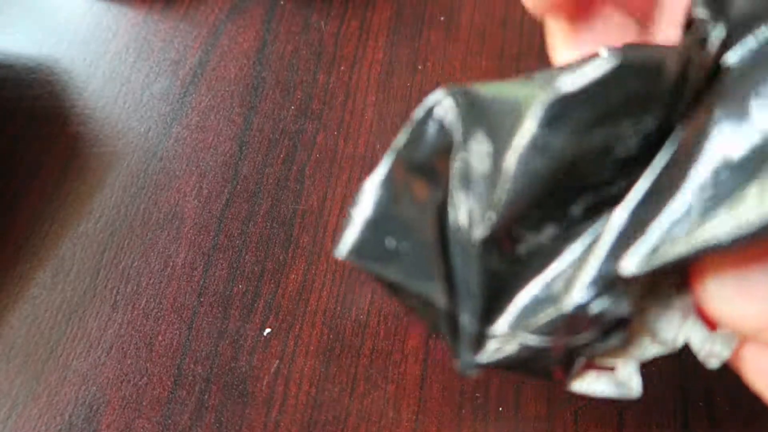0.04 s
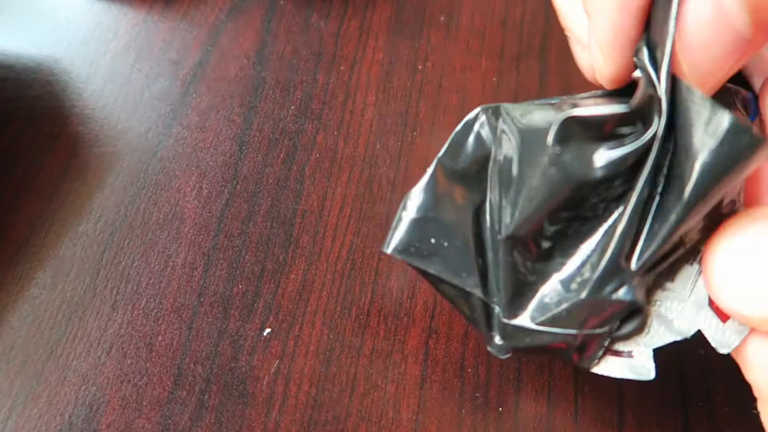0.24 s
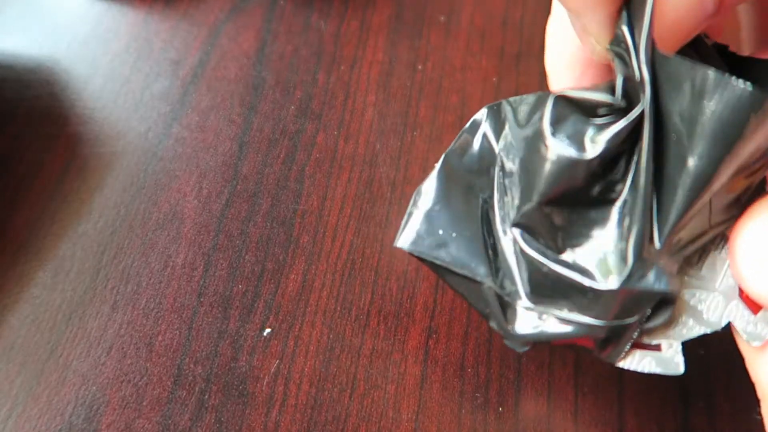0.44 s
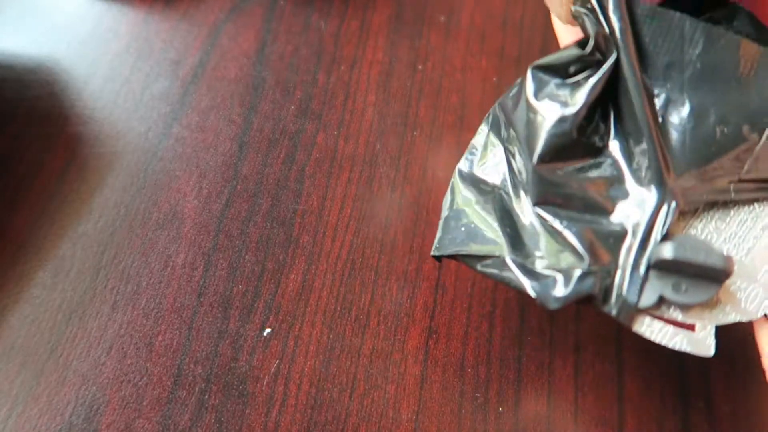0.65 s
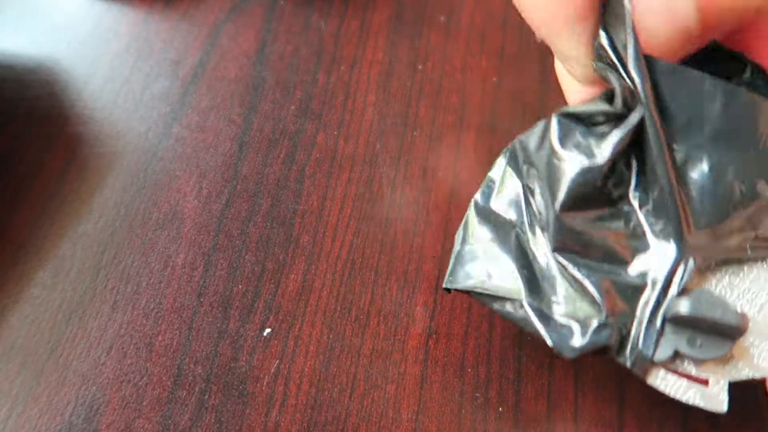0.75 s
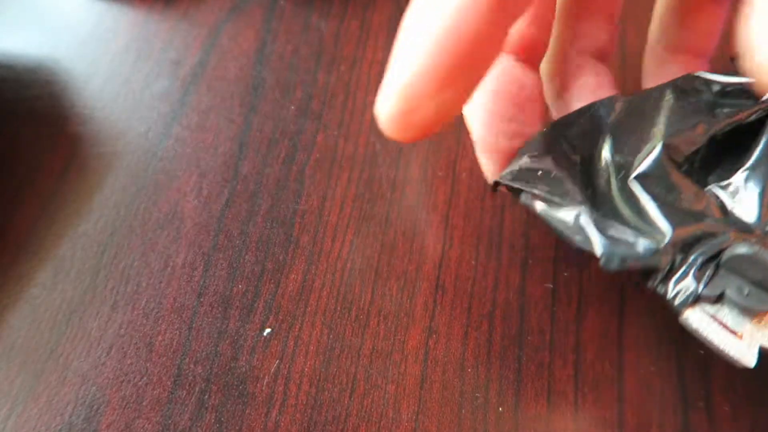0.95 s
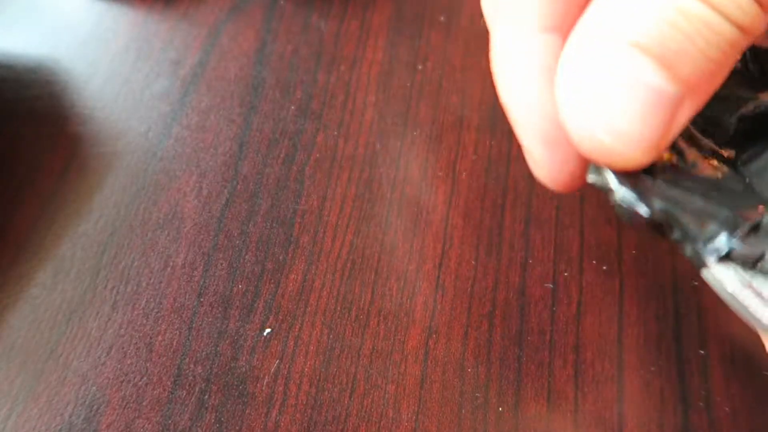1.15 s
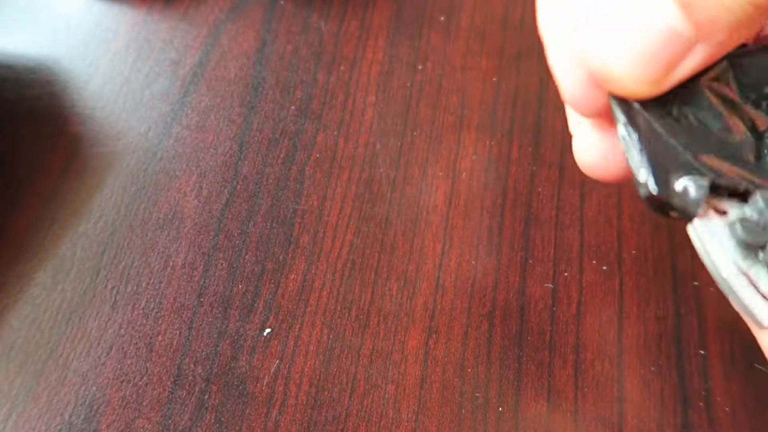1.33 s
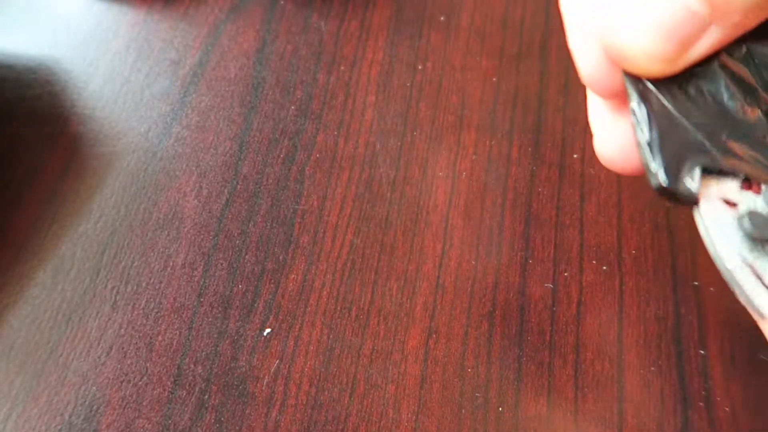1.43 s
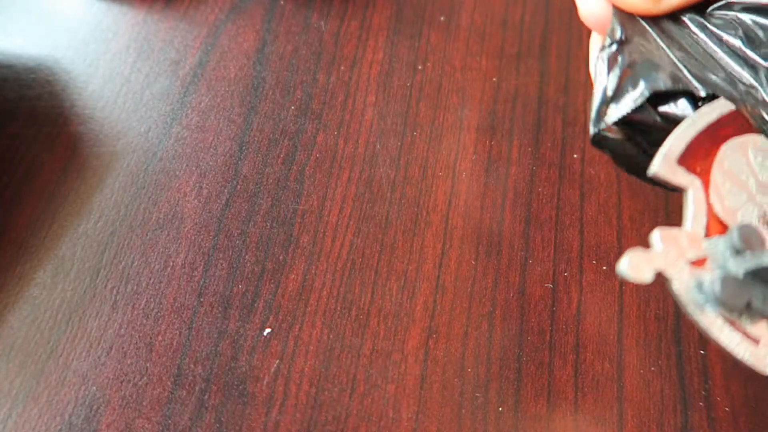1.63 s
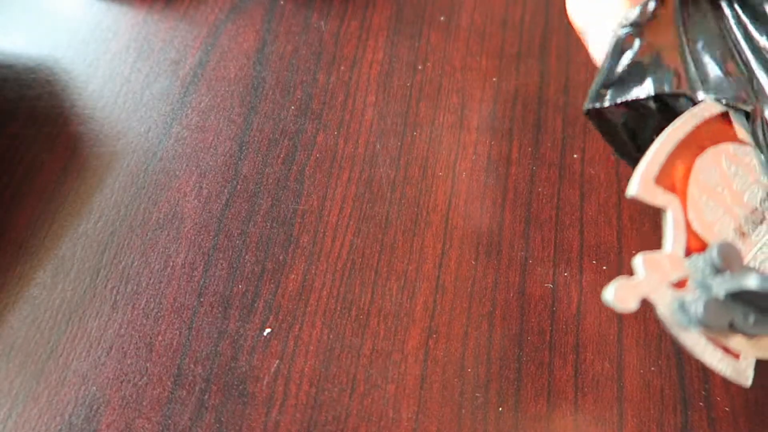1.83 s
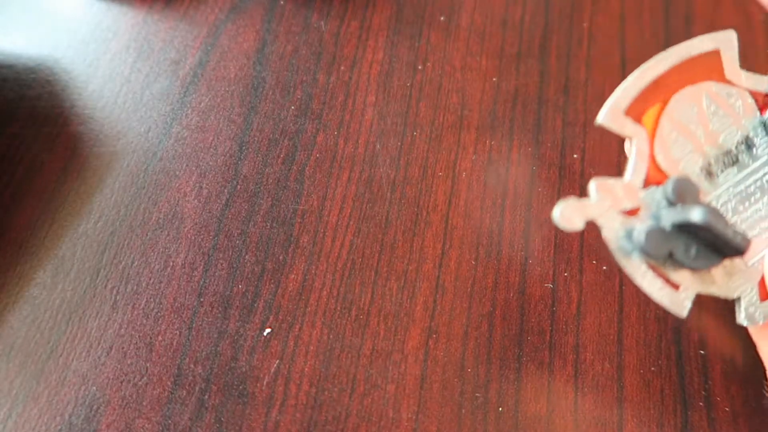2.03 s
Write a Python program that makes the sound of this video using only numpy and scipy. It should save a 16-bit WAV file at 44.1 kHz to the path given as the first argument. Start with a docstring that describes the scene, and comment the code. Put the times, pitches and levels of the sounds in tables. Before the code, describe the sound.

Crinkling plastic-foil wrapper, close up, snapping and rustling unevenly in a small quiet room

```python
"""Crisp snaps and a short rustle open the scene: hands squeeze and open a stiff foil bag over a table.
Creases buckle one by one: each snap is a brief ring of a foil facet, a sharp crack and a low flap.
Each squeeze adds tiny crackles, sliding hiss and facet ticks; large panels pop with a thump and a flutter.
The bag is close to the microphone; a small room answers over low noise and a faint hum."""
import sys
import numpy as np
from scipy import signal
from scipy.fft import rfft, irfft, next_fast_len
from scipy.io import wavfile

SR = 44100
rng = np.random.default_rng(int(sys.argv[2]) if len(sys.argv) > 2 else 0)


def master(y):
    """Save y as 16-bit WAV."""
    cut = np.clip(np.atleast_2d(y).T, -1, 1)
    pcm = np.round(cut * 32767)  # scale
    wavfile.write(sys.argv[1], SR, pcm.astype(np.int16))


N = 91683  # length in samples

# Creases that buckle: start_s, facet_pitch_hz, ring_time_cycles, ring_level_db, crack_level_db
SNAPS = [(0.0114, 2880, 0.27, -24, -26.5), (0.0181, 4570, 1, -25, -36), (0.0225, 2760, 0.17, -15, -42),
         (0.0287, 3900, .48, -22.5, -27.5), (0.037, 2930, 0.54, -23.5, -38), (0.07, 1540, .71, -30.5, -38),
         (0.105, 3670, .31, -23.5, -45), (0.115, 1490, 1, -21.5, -22.5), (0.1465, 1590, 0.73, -31, -38),
         (0.153, 1270, 0.99, -31, -42), (0.174, 3100, 0.43, -16, -34), (0.199, 2850, 0.3, -23.5, -34),
         (0.2175, 2350, 0.56, -17.5, -19.5), (0.262, 3030, 0.43, -22, -31), (0.2749, 3600, 1.4, -20, -28),
         (0.2805, 7000, 0.85, -22, -30), (0.2849, 4860, 0.36, -18, -18), (0.2906, 1280, 0.67, -17, -15.5),
         (0.3096, 7700, 0.26, -18, -14), (0.3334, 2580, 0.39, -30, -46), (0.3585, 1000, 0.51, -27, -26),
         (0.435, 3040, 0.43, -17, -27), (0.439, 2680, 0.3, -22.5, -44), (0.4426, 2334, .6, -27.5, -38),
         (0.4515, 3320, 0.7, -23, -26), (0.4605, 3100, .7, -26, -40), (0.502, 3190, 0.75, -17.5, -23),
         (0.5225, 3200, 0.62, -24.5, -40), (0.5257, 3010, 0.31, -24.5, -36), (0.545, 1500, 0.59, -18, -24),
         (0.5642, 3380, 0.17, -22, -45), (0.5763, 800, 0.26, -17.5, -17), (0.5782, 2580, 0.32, -18.5, -35),
         (0.5803, 1176, 1.76, -11, -29), (0.5834, 2420, 0.33, -10.5, -24), (0.5896, 2380, 0.32, -21, -28),
         (0.596, 3180, 0.45, -16, -20), (0.6031, 2900, 0.43, -16.5, -26), (0.6084, 9500, 0.52, -18.5, -29),
         (0.6093, 3670, 0.36, -13, -31), (0.6186, 2440, 0.37, -21, -22), (0.624, 5170, 0.16, -17, -16.5),
         (0.6268, 2450, .57, -15, -21), (0.6285, 3400, 1.3, -17.5, -20.5), (0.698, 3400, 0.44, -27.5, -29),
         (0.7404, 1520, 0.69, -23.5, -24), (0.834, 1320, 0.39, -27, -31), (0.8514, 3170, 0.28, -19, -25.5),
         (0.8776, 910, 0.31, -15.5, -13), (0.8804, 1290, 0.15, -16.5, -42), (0.8959, 3370, 1.4, -20.5, -20),
         (0.9206, 2980, 0.58, -18, -43), (0.9297, 3010, 0.38, -23, -28), (0.934, 2410, 0.33, -27, -31),
         (0.9418, 3570, 0.63, -8.5, -23), (1.0247, 3190, 1, -14, -22), (1.0568, 2920, 0.68, -21, -43),
         (1.0585, 1450, 0.64, -18.5, -56), (1.1212, 1740, 0.13, -25, -35), (1.1452, 3400, 1.5, -24, -46),
         (1.1481, 3060, 0.53, -21.5, -40), (1.1831, 3260, 0.26, -21.5, -21), (1.1856, 1060, 0.85, -24, -21),
         (1.2013, 1530, .35, -22.5, -33), (1.2354, 1950, 0.42, -21, -20.5), (1.2518, 1840, .33, -21.5, -30),
         (1.2785, 2130, 0.37, -17, -17), (1.2813, 1420, 0.56, -21, -47), (1.2868, 3670, 0.94, -21.5, -31),
         (1.2952, 1110, .6, -33, -38), (1.3123, 1300, 0.76, -20, -39), (1.3173, 2800, 0.31, -19.5, -48),
         (1.4312, 1414, .9, -11, -19.5), (1.4515, 1740, 1.1, -27, -28.5), (1.4815, 1890, 0.56, -34.5, -50),
         (1.493, 1320, 0.65, -26.5, -23), (1.4983, 4430, 0.51, -21, -36), (1.594, 2950, .24, -30.5, -45),
         (1.6065, 1810, .7, -35, -60), (1.6305, 2240, 0.37, -34, -56), (1.6525, 4370, 0.72, -29.5, -37),
         (1.658, 4390, 0.21, -28.5, -41), (1.6652, 1385, 0.39, -9, -15), (1.669, 4400, 0.54, -20, -27),
         (1.683, 2500, 1.6, -20.5, -19), (1.691, 1920, 0.6, -23.5, -28), (1.6969, 1530, 1.2, -27.5, -24),
         (1.7128, 2640, 1.3, -28, -24), (1.7207, 4300, .6, -25.5, -37), (1.807, 1320, 0.45, -32, -33.5),
         (1.8385, 2400, 1.3, -39, -31.5), (1.871, 3170, .5, -32, -32), (1.8782, 4960, 0.22, -24.5, -27),
         (1.9173, 4200, .84, -19, -23.5), (1.9258, 3600, 1.4, -28, -20.5), (1.9598, 2940, 0.37, -26, -40),
         (1.9683, 3290, .5, -25.5, -25.5), (1.9725, 2080, .14, -23, -45), (1.9923, 1180, 0.36, -19.5, -17),
         (2.001, 2560, 1.3, -21, -30), (2.0071, 2570, 1.3, -17, -38), (2.0492, 4300, 0.56, -21.5, -29),
         (2.053, 1920, 0.35, -22, -24), (2.0663, 2330, 0.18, -22, -28)]
# Squeezes that rustle: start_s, length_s, body_level_db, treble_level_db (both before the trims below)
SQUEEZES = [(0.003, 0.042, -39, -41.5), (0.114, 0.046, -41, -47.5), (0.273, 0.053, -41.5, -31),
            (0.343, 0.024, -39, -57), (0.43, 0.019, -33.5, -38.5), (0.525, 0.041, -38, -52),
            (0.576, 0.054, -31.5, -30.5), (0.866, 0.056, -36, -35), (1.122, 0.027, -41.5, -56),
            (1.17, 0.164, -43.5, -51.5), (1.346, 0.036, -46.5, -58), (1.415, 0.025, -35, -34),
            (1.665, 0.022, -35, -31), (1.699, 0.035, -56, -40), (1.899, 0.18, -40, -47)]
# Large panels popping through: start_s, pitch_hz, level_db
THUMPS = [(.022, 269, -32), (0.5014, 306, -25), (0.5761, 264, -20), (0.583, 191, -26.5),
          (0.622, 197, -27.5), (0.626, 493, -20.5), (0.878, 186, -30), (0.8795, 445, -29.5),
          (1.0571, 430, -23.5), (1.147, 665, -23), (1.431, 440, -30), (1.6659, 518, -15.5),
          (1.991, 500, -29.5)]
# Tone of a crack: frequency_hz, relative_level_db
CRACK_TONE = [(100, -34.5), (900, -6), (2500, 6.5), (7000, 0.5), (9000, -6), (12000, -8.5), (15000, -24.5)]
# Tone of the rustle's body: frequency_hz, relative_level_db
RUSTLE_TONE = [(60, -20), (200, 1), (500, 3.5), (1300, 4.5), (3200, 3), (4800, -4), (7000, -50)]
# Tone of the rustle's treble: frequency_hz, relative_level_db
FIZZ_TONE = [(2500, -6), (5200, 2), (7500, 0.5), (9000, -4), (12000, -4), (15000, -23)]
# Tone of a panel's flutter: frequency_hz, relative_level_db
FLUTTER_TONE = [(90, -28), (220, 1), (480, 4), (800, -35)]
# Time for the room tail to fall 60 dB: frequency_hz, decay_s
ROOM_T60 = [(150, 0.3), (3000, 0.15), (12000, 0.15)]
# Likeness of left and right in rustle and room noise: frequency_hz, correlation (1 = identical)
LIKENESS = [(100, 0.98), (220, 0.043), (600, 0.18), (2000, 1), (10000, 0.24)]
# Tone of the room noise: frequency_hz, relative_level_db
FLOOR_TONE = [(25, -5), (45, -7), (130, -3), (220, -9.5), (420, -12), (14000, -46)]
# Steady hum tones: frequency_hz, level_db
HUM = [(120, -59), (208, -59)]

# Background and room
FLOOR_DB = -49.5
ROOM_DB = -14.5

# Rustle: trims inside a squeeze, then levels while the bag is only held
RUSTLE_TRIM_DB, FIZZ_TRIM_DB = -5, -1
REST_DB, REST_FIZZ_DB = -61, -61.5
ATTACK_S, RELEASE_S = 0.0025, 0.007  # exponential rise and fall around a squeeze
GRAINS_PER_S_PER_BAND, GRAIN_SPREAD_DB = 450, 3
SLIDE_SHARE = 0.15  # gain of the sliding hiss against crackles of rms 1
TICKS_PER_S, TICK_HZ, TICK_REACH_OCTAVES = 260, 2620, 1.28  # pitches reach this far either way
TICK_CYCLES, TICK_DB, TICK_SPREAD_DB = 0.53, 3.5, 6  # ticks are up to the spread louder than TICK_DB

# Thumps: the panel's two modes, the puff of air it pushes, and the flutter after the pop
THUMP_CYCLES, PANEL_RATIO, PANEL_GAIN = 0.98, 1.428, 0.63
PUSH_HZ, PUSH_DB = 80, -20
FLUTTER_DB, FLUTTER_S = -11, 0.0065

# Snaps
CRACK_S, CRACK_SPIKE = 0.0008, 4  # decay of the crack's noise; height of its first sample
BOUNCE_GAIN, BOUNCE_S = 0.3, 0.00061  # a close echo of the crack off the table, delayed by up to this time
OVERTONE_DB, OVERTONE_CYCLES = -13.5, 1.86  # second mode of a facet
FLAP_HZ, FLAP_CYCLES, FLAP_DB = 517, 0.9, -22.5
NEAR_DB, NEAR_S = -11, 0.0045  # early echoes off table and hands, and their decay
SLIP_DB, SLIP_S = -16.5, 0.003  # a crease gives a little before it snaps, up to this much earlier
DISPERSE_S, DISPERSE_HZ = 0.000732, 2880  # the bass lags by this time; the lag halves at this pitch

# Placement and recorder
LAG_S, LEFT_DB = 0.000016, -0.54  # left against right
TOP_HZ, LOW_CUT_HZ = 16000, 34.5


def amp(db):
    """Turn decibels into gain."""
    return 10 ** (np.asarray(db) / 20)


def unit(x):
    """Scale to rms 1."""
    return x / np.sqrt(np.mean(x ** 2) + 1e-20)


def burst(x):
    """Scale to the energy of one millisecond at rms 1."""
    return x * np.sqrt(SR / 1000 / np.sum(x ** 2))


def along(points, hz):
    """Read a curve of (frequency_hz, value) points on a log frequency axis."""
    f, v = np.transpose(points)
    return np.interp(np.log(hz + 1), np.log(f + 1), v)


def filtered(x, response):
    """Filter x by a response given as a function of frequency."""
    m = next_fast_len(N + SR // 2)
    return irfft(rfft(x, m) * response(np.fft.rfftfreq(m, 1 / SR)), m)[..., :N]


def causal(points, size=2048):
    """Minimum-phase response of a tone curve, so a coloured sound keeps its sharp start."""
    cepstrum = irfft(np.log(amp(along(points, np.fft.rfftfreq(size, 1 / SR)))))
    cepstrum[1:size // 2] *= 2
    cepstrum[size // 2 + 1:] = 0
    return np.exp(rfft(cepstrum))


def spread(pair, tone):
    """Colour two unrelated signals and blend them as mid and side into a stereo sound of rms 1."""
    def mid_side_gains(hz):
        turn = np.arccos(np.clip(along(LIKENESS, hz), -1, 0.995)) / 2
        return amp(along(tone, hz)) * [np.cos(turn), np.sin(turn)]

    mid, side = filtered(pair, mid_side_gains)
    return unit(np.array([mid + side, mid - side]))


def add(track, s, sound):
    """Mix a sound into the track at time s, or at the start if s is negative."""
    part = track[..., max(0, round(s * SR)):]
    n = min(part.shape[-1], sound.shape[-1])
    part[..., :n] += sound[..., :n]


def ring(hz, cycles, size=2048):
    """A heavily damped swing of the foil: a sine that swells and dies within a few cycles."""
    turns = np.arange(size) / SR * hz
    u = turns / max(cycles, 0.1)
    return burst(u * np.exp(-u) * np.sin(2 * np.pi * turns))


def background():
    """Low room noise, shaped from random noise, under steady sines for the faint hum."""
    t = np.arange(N) / SR
    hum = np.zeros(N)
    for hz, db in HUM:
        hum += amp(db) * unit(np.sin(2 * np.pi * (hz * t + rng.random())))
    return amp(FLOOR_DB) * spread(rng.standard_normal((2, N)), FLOOR_TONE) + hum


def room(x, count=8, width=0.26):
    """A short diffuse tail of decaying noise, drawn anew for each stretch as the bag moves."""
    out = np.zeros((2, N))
    mono = x.mean(0)
    for part in np.array_split(np.arange(N), count):
        hz, t, bins = signal.stft(rng.standard_normal((2, SR // 3)), SR, nperseg=256)
        decay = amp(-60 * t / along(ROOM_T60, hz)[:, None])
        mid, side = signal.istft(bins * decay, SR, nperseg=256)[1]
        tail = np.array([mid + width * side, mid - width * side])
        tail /= np.linalg.norm(tail[0])
        reply = signal.fftconvolve(mono[None, part], tail, axes=1)
        add(out, part[0] / SR + 0.003, reply)  # 3 ms before the tail starts
    return out


def crackles(count=7):
    """Tiny grains over the hiss of sliding foil; each grain sounds in about one octave only."""
    hits = rng.random((count, N)) < GRAINS_PER_S_PER_BAND / SR
    sizes = hits * amp(GRAIN_SPREAD_DB * np.clip(rng.standard_normal((count, N)), -2, 2))
    signs = rng.choice([-1, 1], (2, count, N))  # drawn separately for each channel

    def octave_bands(hz):
        octaves_down = np.clip(np.log2(TOP_HZ / (hz + 1)), 0, count - 1)
        distance = octaves_down - np.arange(count)[:, None]
        return np.cos(np.pi / 2 * np.clip(distance, -1, 1))

    grains = filtered(sizes * signs, octave_bands)
    return unit(grains.sum(1)) + SLIDE_SHARE * rng.standard_normal((2, N))


def ticks(strength):
    """Small facets flip at random, each at its own pitch, as hard as the bag is being squeezed."""
    out = np.zeros(N)
    for when, pitch, size in rng.random((int(TICKS_PER_S * N / SR), 3)):
        hz = TICK_HZ * 2 ** (TICK_REACH_OCTAVES * (2 * pitch - 1))
        level = strength[int(when * N)] * amp(TICK_DB + TICK_SPREAD_DB * size)
        add(out, when * N / SR, level * ring(hz, TICK_CYCLES))
    return out


def rustle():
    """Tiny crackles, sliding foil and ticks swell with each squeeze; body and treble have own levels."""
    t = np.arange(N) / SR
    body, fizz = np.full(N, amp(REST_DB)), np.full(N, amp(REST_FIZZ_DB))
    for s, length, body_db, fizz_db in SQUEEZES:
        rise, fall = (t - s) / ATTACK_S, (s + length - t) / RELEASE_S
        shape = np.exp(np.minimum(0, np.minimum(rise, fall)))
        body = np.maximum(body, amp(body_db + RUSTLE_TRIM_DB) * shape)
        fizz = np.maximum(fizz, amp(fizz_db + FIZZ_TRIM_DB) * shape)
    grains = crackles()
    return body * spread(grains, RUSTLE_TONE) + fizz * spread(grains, FIZZ_TONE) + ticks(body)


def thumps(size=2048):
    """A large panel pops through in two modes, pushes a little air and flutters on."""
    out, t = np.zeros((2, N)), np.arange(size) / SR
    for s, hz, db in THUMPS:
        noise = rng.standard_normal(size) * np.exp(-t / FLUTTER_S)
        flutter = burst(irfft(rfft(noise) * causal(FLUTTER_TONE)))
        second_mode = ring(hz * PANEL_RATIO, THUMP_CYCLES * PANEL_RATIO)
        panel = burst(ring(hz, THUMP_CYCLES) + PANEL_GAIN * second_mode)
        pop = panel + amp(PUSH_DB) * ring(PUSH_HZ, cycles=0.1)
        # the flutter has opposite sign at each side
        add(out, s, amp(db) * (pop + amp(FLUTTER_DB) * np.array([flutter, -flutter])))
    return out


def snaps(size=2048, width=0.22):
    """Each crease rings, cracks and flaps; the wave spreads in the sheet and scatters off hands and table."""
    out, t, colour = np.zeros((2, N)), np.arange(size) / SR, causal(CRACK_TONE)
    for s, hz, cycles, ring_db, crack_db in SNAPS:
        noise = rng.standard_normal((4, size))

        crack_decay = np.exp(-t / CRACK_S)
        edge = noise[0] * crack_decay
        edge[0] = CRACK_SPIKE
        crack = burst(irfft(rfft(edge) * colour))
        side = burst(irfft(rfft(noise[1] * crack_decay) * colour))
        bounce = np.roll(crack, round(rng.random() * BOUNCE_S * SR))
        crack = burst(crack + BOUNCE_GAIN * bounce)

        # the second mode's ratio depends on the facet's shape, so it is drawn per snap
        overtone = ring(hz * rng.uniform(1.275, 2.016), OVERTONE_CYCLES)
        facet = burst(ring(hz, cycles) + amp(OVERTONE_DB) * overtone)
        swing = amp(ring_db) * (facet + amp(FLAP_DB) * ring(FLAP_HZ, FLAP_CYCLES))
        snap = swing + amp(crack_db) * np.array([crack + width * side, crack - width * side])

        near = np.array([noise[2] + width * noise[3], noise[2] - width * noise[3]])
        near *= np.exp(-t / NEAR_S) * (t > BOUNCE_S)
        near *= amp(NEAR_DB) / np.linalg.norm(near[0])
        near[:, 0] = 1  # direct sound
        add(out, s, rng.choice([-1, 1]) * signal.fftconvolve(snap, near, axes=1))
        add(out, s - SLIP_S * rng.uniform(0.25, 1), amp(SLIP_DB) * snap)

    def bending_waves(hz):  # treble arrives first
        return np.exp(-2j * np.pi * DISPERSE_S * DISPERSE_HZ * np.arctan(hz / DISPERSE_HZ))

    return filtered(out, bending_waves)


def scene():
    """The bag and its room reply sit slightly to the right of the microphone, over the background."""
    bag = snaps() + thumps() + rustle()
    bag = bag + amp(ROOM_DB) * room(bag)
    sides = np.array([[0.5], [-0.5]])  # left later and softer, right earlier and louder
    placed = filtered(bag, lambda hz: np.exp(-2j * np.pi * hz * LAG_S * sides))
    return amp(LEFT_DB * sides) * placed + background()


def record(dry):
    """The recorder drops the deepest bass and keeps nothing above its band limit."""
    return filtered(dry, lambda hz: (hz < TOP_HZ) * (1j * hz / (1j * hz + LOW_CUT_HZ)) ** 2)


dry = scene()
out = record(dry)
master(out)
```